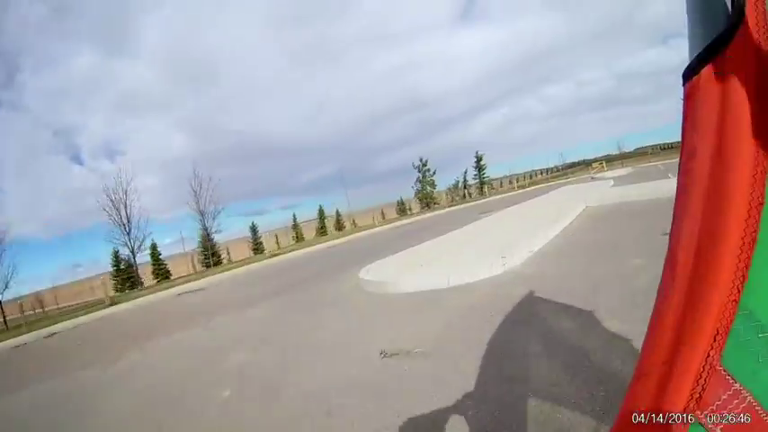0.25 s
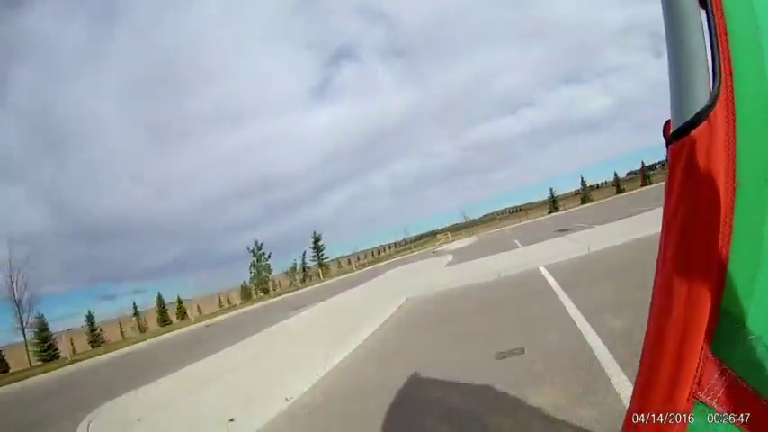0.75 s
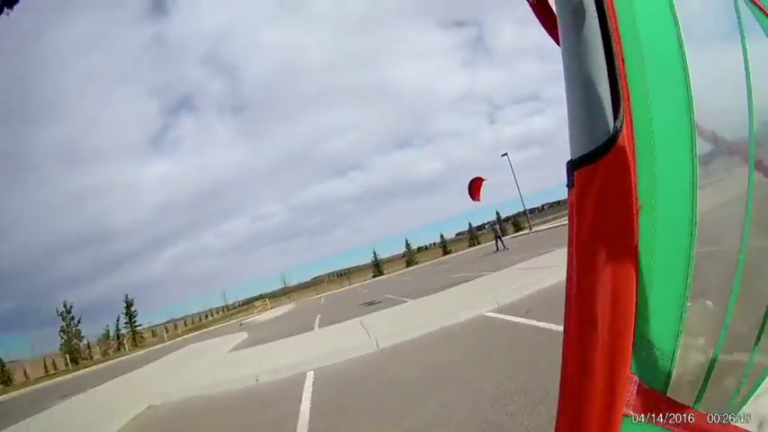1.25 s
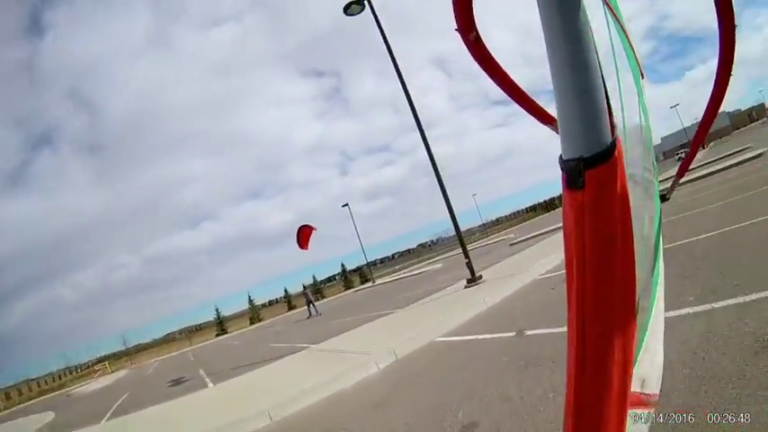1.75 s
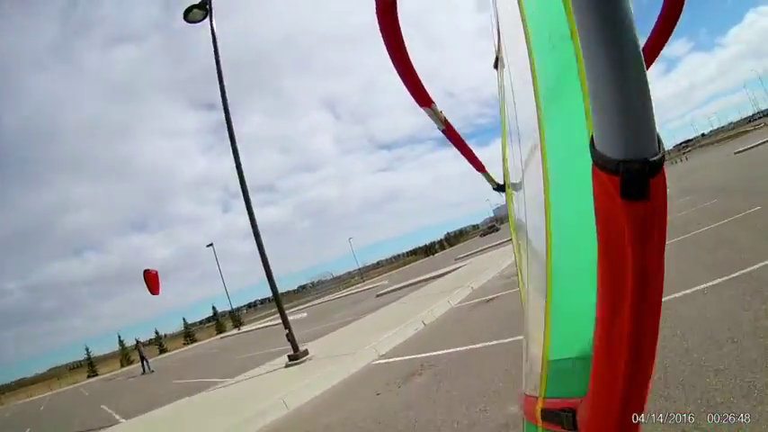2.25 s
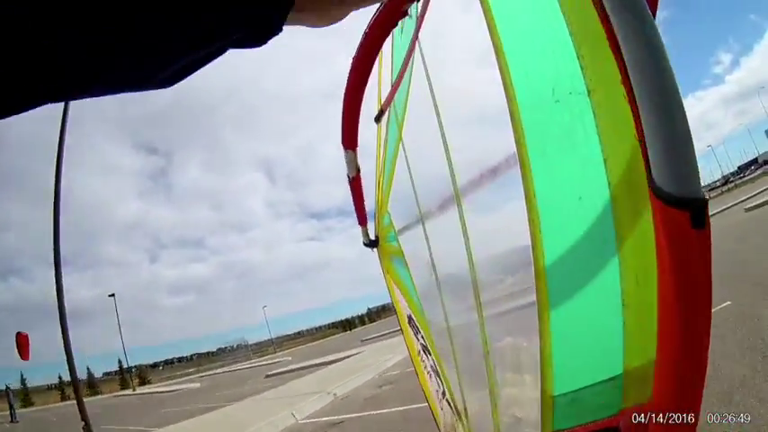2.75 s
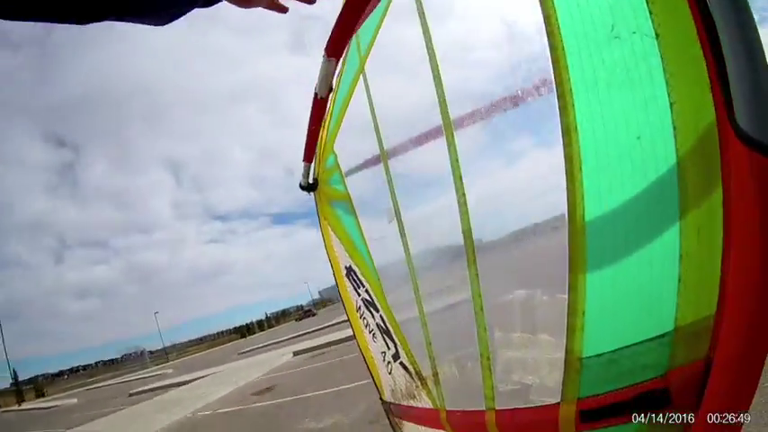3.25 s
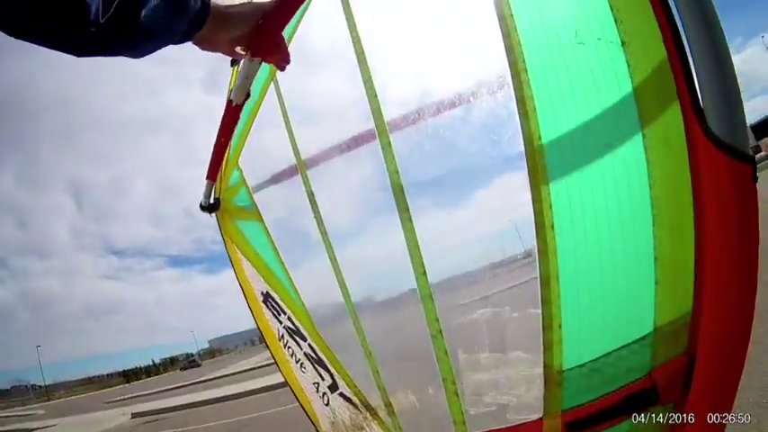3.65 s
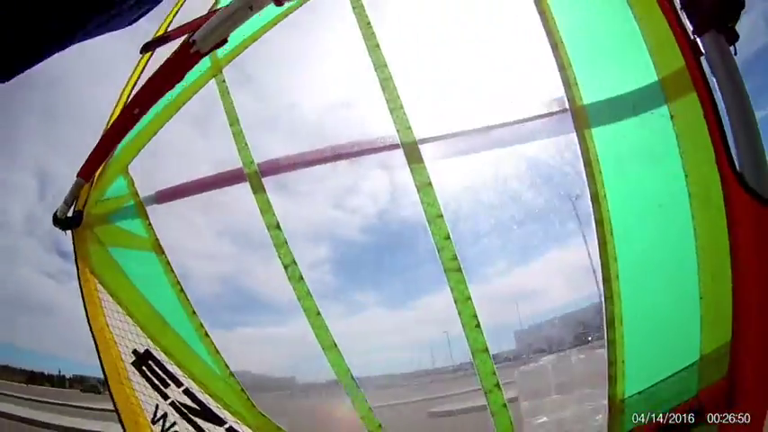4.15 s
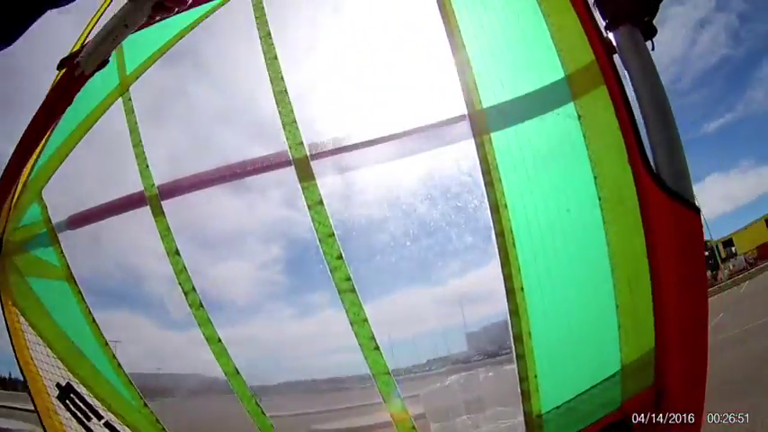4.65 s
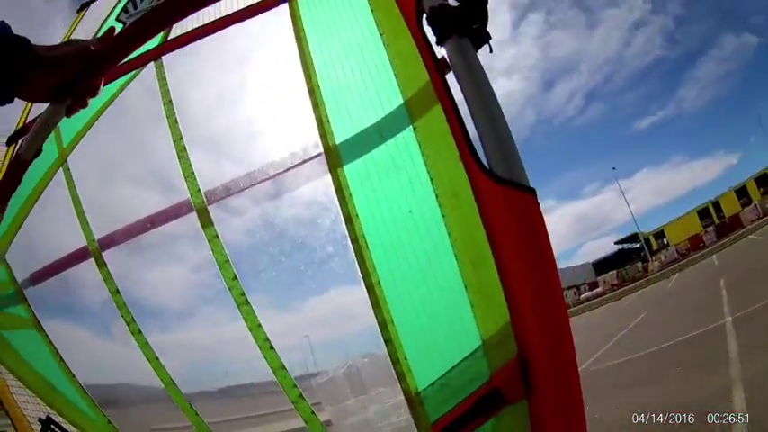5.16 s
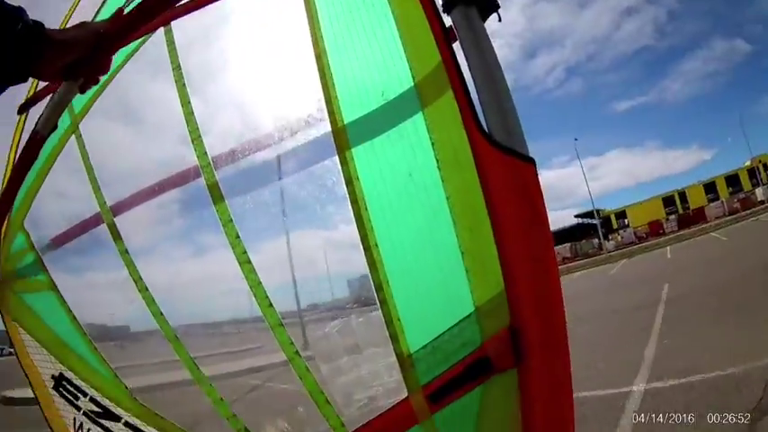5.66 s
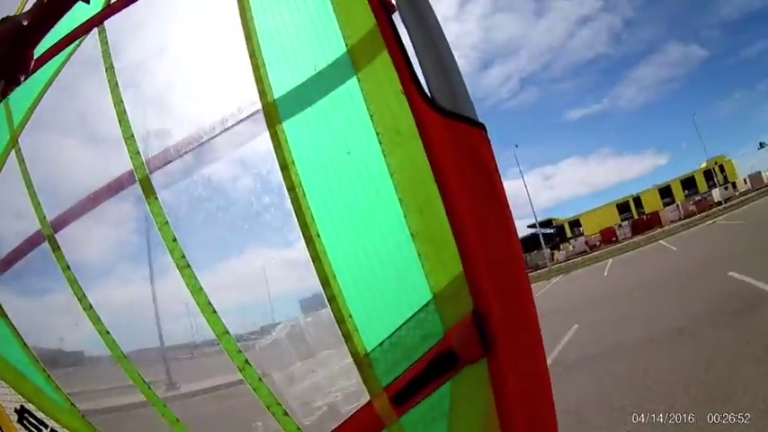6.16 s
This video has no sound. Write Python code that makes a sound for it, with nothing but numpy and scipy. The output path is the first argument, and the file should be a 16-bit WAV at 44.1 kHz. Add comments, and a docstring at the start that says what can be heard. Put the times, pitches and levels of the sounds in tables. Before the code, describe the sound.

In an open asphalt lot, a small camera microphone on the rig of a sail-driven rolling board catches wind from the start, over a steady hollow wheel hum and gritty crackle. At about 0.05 s loose rig parts clack hard in a quick rattle; a dull bump comes at 0.4 s and another knock at 0.6 s. A gust swells around 0.8 s while the sailcloth swishes and dies away. Short creaks follow from 1 to 1.8 s. Near 1.9 s the wind suddenly drops, leaving wheel hum, light bumps and longer dry creaks until about 2.8 s. Wind creeps back with thudding puffs at 3.0 and 3.3 s, then surges around 4.1 s with a heavy bump. A faint knock comes at 4.6 s. Strong low buffeting, roar and fluttering rush continue, swelling near 5.9 s, with a few more creaks, to the end at 6.4 s.

```python
"""An open asphalt lot: a longboard driven by a windsurf sail, heard from a small camera on the rig.
Wind is noise shaped into rumble, roar, rush and hiss; large eddies are short swings of pressure at the port.
It buffets the microphone, drops away in the turn and comes back much harder on the new course.
Close by, the rig clacks (noise bursts and boom rings), creaks (stick-slip runs) and swishes as the sail fills.
Underfoot, tiny impacts of grit keep the board humming, with dull thumps over bumps in the asphalt."""
import sys
import numpy as np
from scipy import signal
from scipy.fft import rfft, irfft, next_fast_len
from scipy.io import wavfile
from scipy.ndimage import map_coordinates

SR = 44100
rng = np.random.default_rng(int(sys.argv[2]) if len(sys.argv) > 2 else 0)


def log_audio(samples):
    """Write samples as a 16-bit WAV file to the path given in sys.argv[1]."""
    # one column per channel
    frames = np.atleast_2d(samples).T
    # limit to full scale, then quantise
    limited = np.clip(frames, -1, 1)
    pcm = np.round(limited * 32767).astype(np.int16)
    wavfile.write(sys.argv[1], SR, pcm)


N = 281799  # length in samples


def amp(db):
    """Decibels to gain."""
    return 10 ** (np.asarray(db) / 20)


def unit(x):
    """Scaled to rms 1."""
    return x / np.sqrt(np.mean(x ** 2) + 1e-20)


def seconds():
    """Time of every sample, in s."""
    return np.arange(N) / SR


def curve(rows):
    """Straight lines through (t/s, level/dB) rows, one value per sample."""
    s, db = np.transpose(rows)
    return np.interp(seconds(), s, db)


def swells(rows):
    """Sum of bell-shaped rises or dips in dB, one for each (t/s, half length/s, change/dB) row."""
    t = seconds()
    return sum(db * np.exp(-((t - s) / length) ** 2) for s, length, db in rows)


def wobble(rate):
    """A smooth random curve, rate knots a second."""
    return map_coordinates(rng.standard_normal(N // 20), [np.arange(N) * rate / SR], mode="wrap")


def gains(points, hz):
    """Gain of (f/Hz, level/dB) points, joined on a log frequency axis."""
    f, db = np.transpose(points)
    return amp(np.interp(np.log(hz + 1), np.log(f + 1), db))


def filtered(x, response):
    """x passed through a response given as a function of frequency."""
    size = next_fast_len(N + SR // 2)
    return irfft(rfft(x, size) * response(np.fft.rfftfreq(size, 1 / SR)), size)[:N]


def noise(spectrum):
    """Coloured noise of rms 1."""
    return unit(filtered(rng.standard_normal(N), lambda hz: gains(spectrum, hz)))


def struck(force, spectrum, size=2048):
    """A force heard through a causal body of unit energy."""
    # folding the cepstrum gives the minimum-phase impulse response of the spectrum
    cepstrum = irfft(np.log(gains(spectrum, np.fft.rfftfreq(size, 1 / SR))))
    cepstrum[1:size // 2] *= 2
    cepstrum[size // 2 + 1:] = 0
    body = irfft(np.exp(rfft(cepstrum)))
    return signal.fftconvolve(force, body / np.linalg.norm(body))[:N]


def grit(rate, spread_db):
    """Randomly timed tiny impacts of uneven size, rate a second, rms 1."""
    hits = rng.random(N) < rate / SR
    sizes = rng.standard_normal(N) * amp(spread_db * rng.standard_normal(N))
    return unit(hits * sizes)


def crackle(rate, t60):
    """Bursts of noise of uneven size, rate a second, each falling 60 dB in t60 s, rms 1."""
    starts = (rng.random(N) < rate / SR) * rng.uniform(0.2, 1, N)
    decay = amp(-60 * np.arange(SR // 20) / SR / t60)
    return unit(signal.fftconvolve(starts, decay)[:N] * rng.standard_normal(N))


# air streaming past the rig before and after the turn: t/s, airflow/dB
AIR_BEFORE, AIR_AFTER = [
    [(0.2, -42), (0.6, -41.5), (0.796, -35.5), (1.282, -51), (2.05, -48.5)],
    [(3.1, -49.5), (4.23, -38), (4.51, -39), (6.07, -33), (6.39, -35)],
]
USUAL_AIR_DB = -40.5


def airflow():
    """Strength of the air streaming past the rig, in dB above the usual."""
    return curve([*AIR_BEFORE, *AIR_AFTER]) - USUAL_AIR_DB


# wind pressure on the microphone port between gusts, before and after the turn: t/s, level/dB
BUFFET_BEFORE = [(0.0, -31.5), (0.782, -27), (1.8, -27.5)]
BUFFET_AFTER = [(2.9, -30.5), (3.57, -26), (4.24, -18.5), (6.07, -16.5), (6.39, -18.5)]
# gusts that swell and die: t/s, half length/s, lift/dB
GUSTS = [(.5, 0.033, 5.5), (.83, 0.11, 10), (1.46, .04, 6.5), (1.72, .06, 1.5), (2.82, 0.043, 3),
         (3.28, .04, 0), (3.56, 0.035, 3), (3.86, 0.056, 2.5), (4.1, 0.16, 7), (5.92, 0.19, 1.5)]
# colours of the wind's four layers, low to high: f/Hz, relative level/dB
RUMBLE = [(10, -11), (30, -2.5), (70, 0.5), (120, -3), (200, -8), (320, -16), (500, -24.5), (1000, -40),
          (2000, -52), (4000, -87)]
ROAR = [(60, -11), (160, 1.5), (300, 3), (430, -2), (540, -7.5), (760, -5), (1000, -15), (1400, -22.5),
        (2000, -42.5), (3000, -51.5), (7000, -71)]
RUSH = [(300, -4.5), (750, 5), (1100, 5), (1500, 1.5), (1950, -2.5), (2250, -8.5), (2600, -17), (3200, -27),
        (6000, -52.5)]
HISS = [(1500, -13.5), (2400, 4), (3200, -4), (3900, 1), (4700, -4.5), (5200, -14.5), (6000, -10),
        (7000, -19), (9000, -37), (14000, -53.5)]
# body of a hard knock, also of the wind's sputter: f/Hz, relative level/dB
CLACK = [(60, 9.5), (300, 8), (1100, -2), (1800, -7.5), (2400, -9.5), (2900, -14), (3300, -30),
         (4500, -20.5), (6500, -36.5), (9000, -47.5), (15000, -74.5)]
USUAL_BUFFET_DB = -25
# each layer: level at the usual strength, and dB gained per dB of pressure, airflow or gust
RUMBLE_DB, RUMBLE_GROWS = -22.5, 1.05
ROAR_DB, ROAR_GROWS, ROAR_GUST_GROWS = -26, 0.52, 0.9
RUSH_DB, RUSH_GROWS = -34, 1.03
HISS_DB, HISS_GROWS = -56.5, 1.25
# in the turn the port lies in the lee of the sail: the buffeting drops at once and creeps back
LEE_FROM_S, LEE_FALL_S, LEE_UNTIL_S, LEE_RETURN_S, LEE_DB = 1.93, 0.054, 2.76, 0.38, -14.5


def wind():
    """Pressure and gusts at the port drive rumble, roar and sputter; airflow drives a fluttering rush and hiss."""
    t = seconds()
    entering = (t - LEE_FROM_S) / LEE_FALL_S
    leaving = (LEE_UNTIL_S - t) / LEE_RETURN_S
    lee = np.clip(np.minimum(entering, leaving), 0, 1)
    pressure_db = curve([*BUFFET_BEFORE, *BUFFET_AFTER]) - USUAL_BUFFET_DB + LEE_DB * lee
    air_db = airflow()
    gust_db = swells(GUSTS)
    rumble_db = RUMBLE_DB + RUMBLE_GROWS * pressure_db + gust_db
    roar_db = ROAR_DB + ROAR_GROWS * pressure_db + ROAR_GUST_GROWS * gust_db
    # large eddies (chop) move all four layers together, small ones (flutter) all but the rumble
    chop, flutter = wobble(19), wobble(90)
    rumble = amp(rumble_db) * unit(noise(RUMBLE) * amp(2.2 * chop))
    roar = amp(roar_db) * unit(noise(ROAR) * amp(1.7 * chop + 1.5 * flutter))
    rush_moves = amp(0.62 * chop + 1.4 * flutter)
    rush = amp(RUSH_DB + RUSH_GROWS * air_db) * unit(noise(RUSH) * rush_moves)
    hiss_moves = amp(2.8 * chop + 0.64 * flutter + 1.6 * wobble(350))
    hiss = amp(HISS_DB + HISS_GROWS * air_db) * unit(noise(HISS) * hiss_moves)
    # short gritty puffs follow the mean level of rumble and roar
    sputter_db = 0.5 * (rumble_db + roar_db) - 20
    sputter = amp(sputter_db) * struck(crackle(rate=54, t60=0.018), CLACK)
    return rumble + roar + rush + hiss + sputter


# single large eddies that hit the port: t/s, relative level/dB, half length/s, f/Hz
EDDIES = [(.515, -14.5, 0.015, 73), (.677, -6.5, 0.0081, 86), (.825, -24, 0.033, 156),
          (3.015, -8.5, 0.014, 87), (3.278, -5.5, 0.013, 75.5), (4.002, -4, 0.013, 132),
          (4.105, 2, 0.019, 137.5), (4.338, -3, 0.0074, 112), (4.435, -5.5, 0.01, 130),
          (4.805, -4, 0.0078, 50), (5.087, -4.5, 0.019, 94.5)]


def eddies():
    """Each large eddy is a bell-shaped burst of swinging pressure with a puff of rough air."""
    t, out, puff = seconds(), np.zeros(N), noise(ROAR)
    for (s, db, length, hz), phase in zip(EDDIES, rng.random(len(EDDIES))):
        swing = np.sin(2 * np.pi * (hz * (t - s) + phase))
        bell = np.exp(-((t - s) / length) ** 2)
        out += amp(db - 4.0) * bell * (swing + 0.34 * puff)
    return out


# air on sailcloth: f/Hz, relative level/dB
CLOTH = [(1000, -16.5), (2400, -1), (3100, -1.5), (3900, -3.5), (5000, -24.5), (8000, -32.5)]
# the swish peaks at SWISH_S, at SWISH_DB
SWISH_S, SWISH_DB, SWISH_RISE_DB_PER_S, SWISH_FALL_DB_PER_S = 0.88, -44, 27.5, 41


def swish():
    """Air slides over the sail as it fills: rough noise grows, then dies away."""
    after = seconds() - SWISH_S
    swish_db = SWISH_DB + np.minimum(SWISH_RISE_DB_PER_S * after, -SWISH_FALL_DB_PER_S * after)
    return amp(swish_db) * unit(noise(CLOTH) * amp(3.5 * wobble(120)))


# creaks and ticks of the sail and boom: t/s, length/s, relative level/dB
CREAKS = [(0.12, .05, -37.5), (1.002, .01, -34.5), (1.129, 0.054, -43), (1.214, .035, -37.5),
          (1.365, 0.034, -38), (1.435, .016, -33.5), (1.783, .05, -39.5), (2.189, 0.23, -36),
          (2.413, .022, -31.5), (2.429, .14, -35), (2.619, 0.2, -39.5), (2.838, .035, -33.5),
          (2.895, 0.028, -34), (2.975, .006, -34), (3.095, .007, -40), (3.418, .07, -43.5),
          (3.916, .006, -30.5), (4.008, .14, -35), (4.094, 0.0037, -28), (4.409, .04, -39.5),
          (4.762, 0.064, -34), (4.89, 0.032, -34), (5.762, 0.078, -33)]
# colour of a creak: f/Hz, relative level/dB
CREAK = [(150, -22.5), (600, 2.5), (1350, 5.5), (2000, -11.5), (2700, -11.5), (3300, -17.5), (4400, -15),
         (5200, -26), (6300, -29.5), (9000, -35.5), (15000, -48)]


def creaks(slip_rate=210, slip_t60=0.024, uneven_db=2.5, taper_db=8, count=64):
    """Under changing load the sail sticks and slips on its spars in quick uneven runs that swell and fade."""
    slips = np.zeros(N)
    for s, length, db in CREAKS:
        chance = rng.standard_normal((count, 2))
        gaps = np.exp(0.44 * chance[:, 0]) / slip_rate
        after = np.cumsum(gaps) - gaps[0]
        # 0 in the middle of the run
        off_centre = (2 * after - length) / (length + 2 / slip_rate)
        slip_db = db + 4.0 - taper_db * off_centre ** 2 + uneven_db * chance[:, 1]
        sizes = amp(slip_db) * (after < length)
        slips += np.bincount(((s + after) * SR).astype(int), sizes, N)[:N]
    decay = amp(-60 * seconds()[:SR // 20] / slip_t60)
    scrape = signal.fftconvolve(slips, decay)[:N]
    return struck(scrape * rng.standard_normal(N), CREAK)


# hard knocks of the rig: t/s, relative level/dB
CLACKS = [(0.0512, -6), (0.0549, -15.5), (0.059, -9), (0.089, -19), (0.094, -15.5), (.596, -14),
          (4.097, -29), (4.593, -23)]
# the boom's ring when it is knocked: f/Hz, relative level/dB, t60/s
BOOM = [(1110, 1.5, 0.047), (1530, -8.5, 0.035), (2320, -11, 0.022), (2810, -12, 0.028)]


def clacks(t60=0.033):
    """Loose parts of the rig rattle briefly; every knock rings the boom at new strengths."""
    t, force, ring = np.arange(SR // 8) / SR, np.zeros(N), np.zeros(N)
    for s, db in CLACKS:
        start = round(s * SR)
        force[start:][:len(t)] += amp(db - 60 * t / t60) * rng.standard_normal(len(t))
        for hz, mode_db, life in BOOM:
            size_db = db + mode_db - 8.0 + rng.normal(0, 1.6)
            ring[start:][:len(t)] += amp(size_db - 60 * t / life) * np.sin(2 * np.pi * hz * t)
    return amp(-3.0) * struck(force, CLACK) + ring


# the wheels thump over bumps in the asphalt: t/s, level/dB, f/Hz
BUMPS = [(0.38, -29.5, 1300), (0.398, -20, 810), (2.261, -27.5, 1330), (2.32, -29, 1230),
         (2.422, -29.5, 1410), (4.04, -13.5, 720)]


def bumps(cycles=10, width=0.39):
    """Each bump shakes the board in a short dull burst of band noise, longer when it is lower."""
    t, out = seconds(), np.zeros(N)
    for s, db, hz in BUMPS:
        band = lambda f: 1 / (1 + ((f / hz - 1) / width) ** 4)
        shake = unit(filtered(rng.standard_normal(N), band))
        out += amp(db) * np.exp(-((t - s) * hz / cycles) ** 2) * shake
    return out


# patches of coarser (+) or smoother (-) asphalt: t/s, half length/s, change of the hum/dB
PATCHES = [(.88, 0.086, 5), (2.295, 0.046, 6.5), (2.95, 0.21, -6), (3.41, .04, 6), (3.56, 0.099, 6),
           (4.38, 0.072, -5), (5.2, 0.11, 3), (6.3, 0.22, 4)]
# resonances of the board and wheels: f/Hz, width/Hz, relative level/dB
BOARD = [(223, 300, -21.5), (576.8, 38.5, 5.5), (668.5, 26, -1.5), (894, 52, -7), (1070, 120, -44),
         (1400, 100, -25)]
# colours of the contact patch and of a pebble's tick: f/Hz, relative level/dB
ROAD = [(30, -13), (90, -9.5), (160, 3), (400, -2.5), (1000, -1.5), (1600, -14.5), (2000, -38.5),
        (3200, -33), (3900, -27.5), (4700, -38), (5150, -51.5), (5900, -44), (7000, -49.5), (9000, -64.5)]
TICK = [(1000, -20), (3000, -0.5), (3800, 8.5), (4700, 0), (5200, -14.5), (6400, -10.5), (9000, -30.5)]
# the hum on ordinary asphalt; the contact patch at the usual airflow, and its dB gained per dB of airflow
ROLL_DB, CONTACT_DB, CONTACT_GROWS = -28, -37, 0.17


def wheels():
    """Stones in the asphalt drum on the wheels: the board rings, the contact patch crackles, loose pebbles tick."""
    def board(f):
        """Sum of the board's resonances, dulled by the soft tyre."""
        modes = sum(amp(db) * 1j * f * w / (c * c - f * f + 1j * f * w) for c, w, db in BOARD)
        soft_tyre = 1 / (1 + (f / 1500) ** 6)
        return modes * soft_tyre

    ring = unit(filtered(grit(rate=3000, spread_db=0.5), board))
    hum = amp(ROLL_DB + swells(PATCHES) + 1.1 * wobble(14)) * ring
    crackling = unit(struck(grit(rate=2200, spread_db=1.5), ROAD)) * amp(0.41 * wobble(25))
    contact = amp(CONTACT_DB + CONTACT_GROWS * airflow()) * crackling
    pebbles = amp(-67) * struck(crackle(rate=11, t60=0.0087), TICK)
    return hum + contact + pebbles


def scene():
    """Wind, rig and board at one microphone."""
    air = wind() + eddies()
    rig = swish() + creaks() + clacks()
    board = bumps() + wheels()
    return (air + rig + board)[None]


# the microphone's response, with a deep treble notch: f/Hz, gain/dB
MIC = [(6800, -1), (7400, -6.5), (8000, -25.5), (8500, -5), (10000, -12.5)]
TOP_HZ = 15760  # nothing passes from here up


def record(dry):
    """The camera colours the treble, adds faint hiss, rounds peaks off towards full scale and limits the band."""
    sound = filtered(dry[0], lambda hz: gains(MIC, hz)) + amp(-77.5) * rng.standard_normal(N)
    sound = sound / (1 + sound ** 8) ** (1 / 8)
    return filtered(sound, lambda hz: hz < TOP_HZ)[None]


dry = scene()
out = record(dry)
log_audio(out)
```